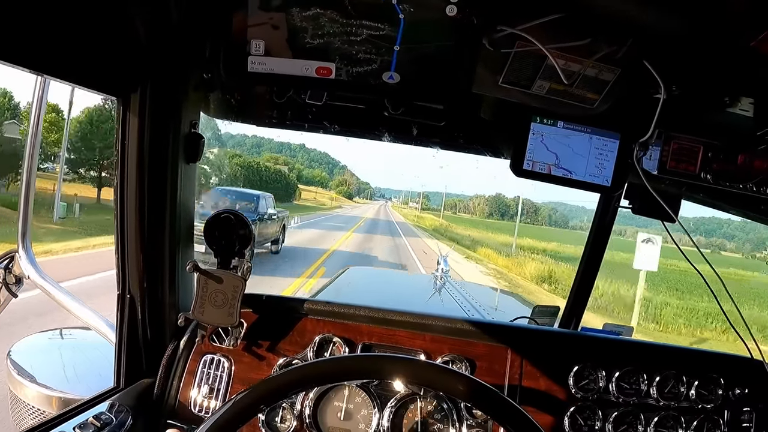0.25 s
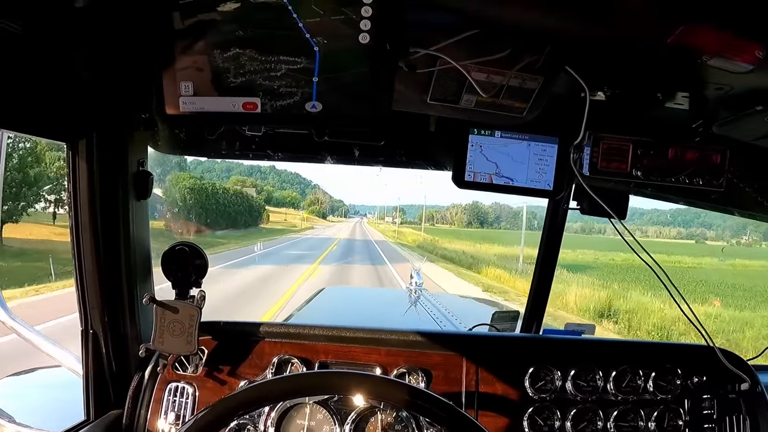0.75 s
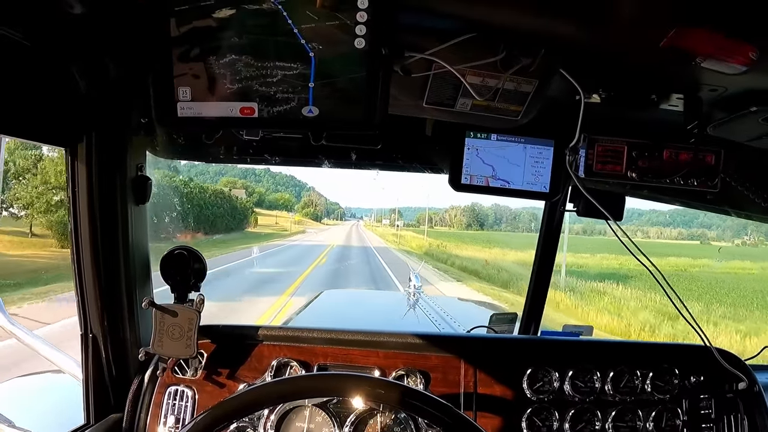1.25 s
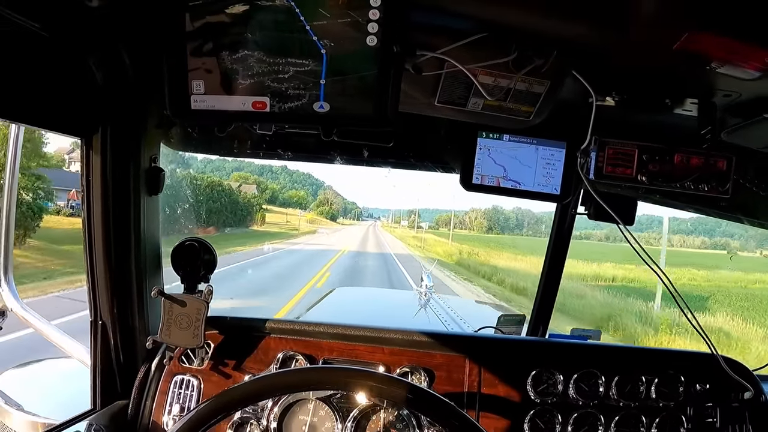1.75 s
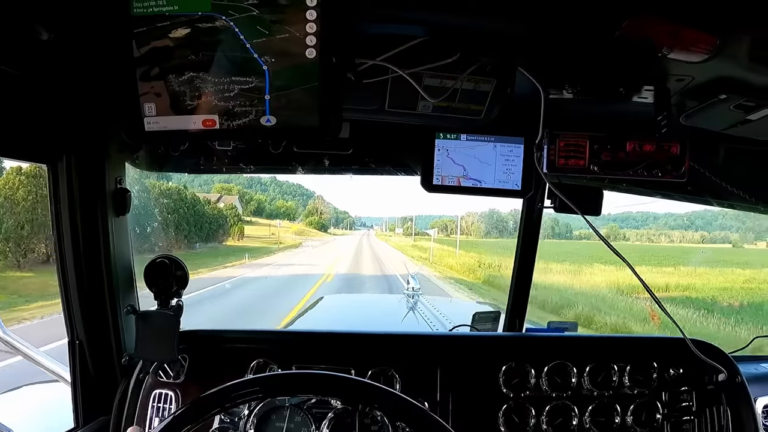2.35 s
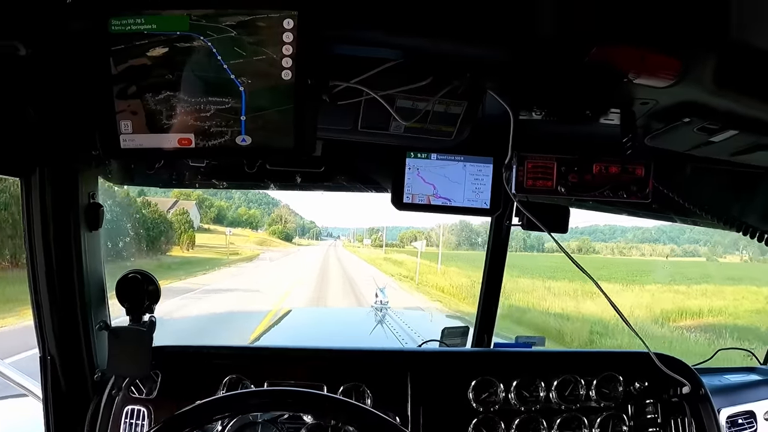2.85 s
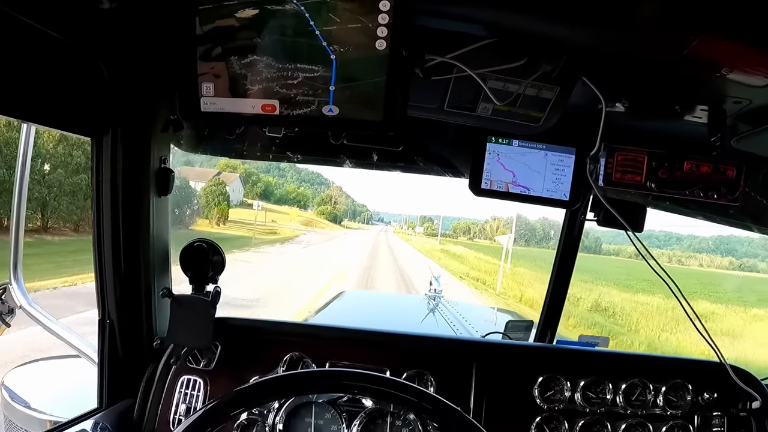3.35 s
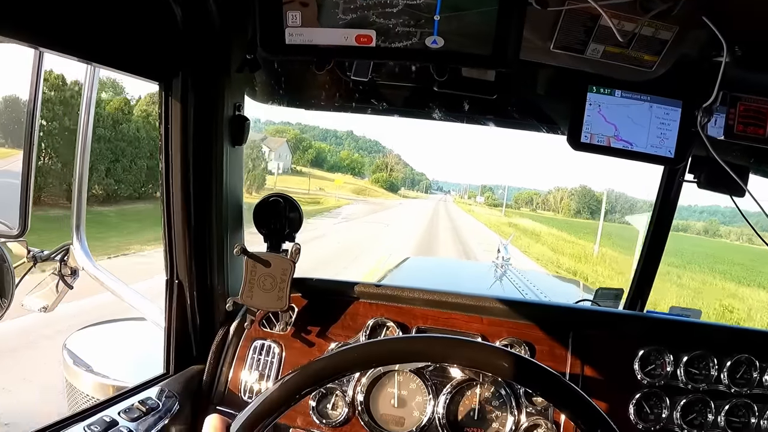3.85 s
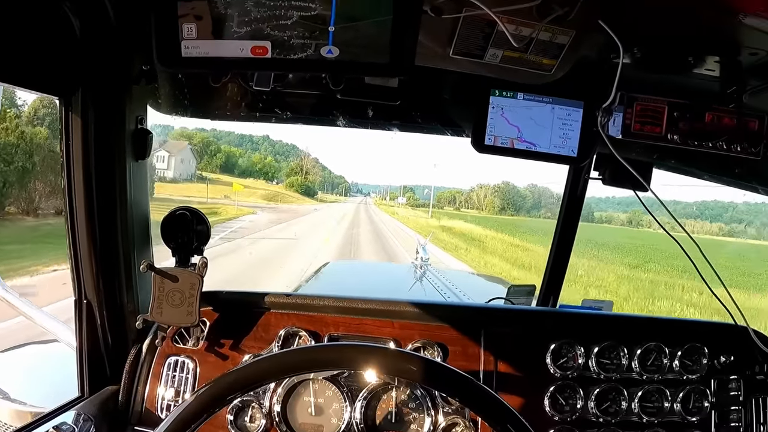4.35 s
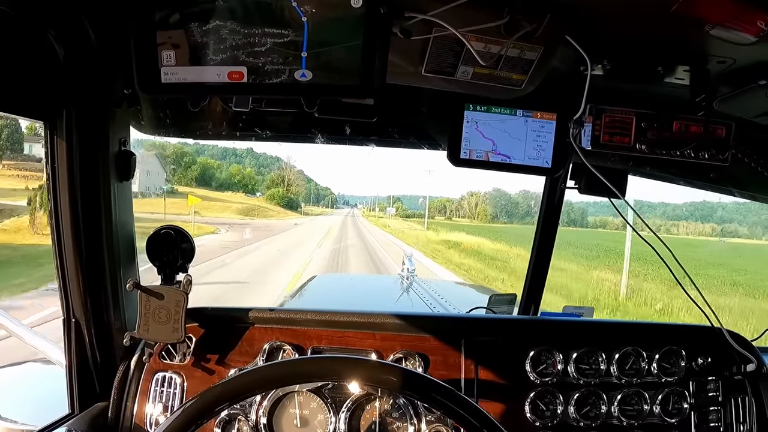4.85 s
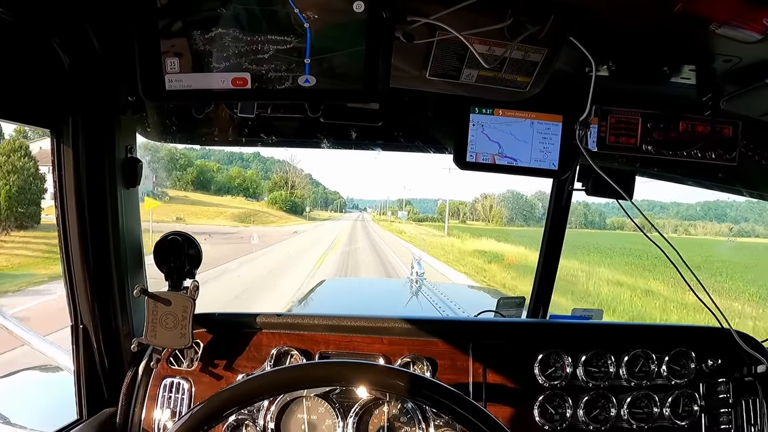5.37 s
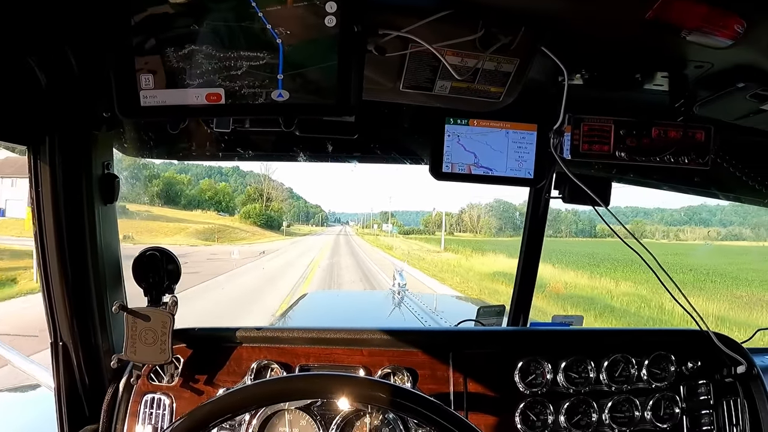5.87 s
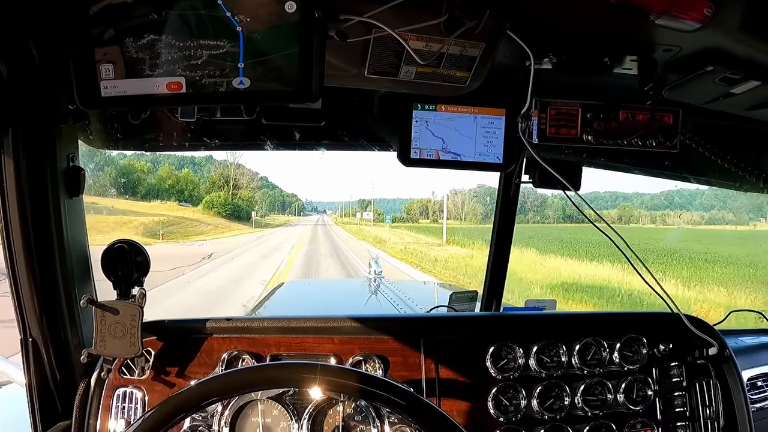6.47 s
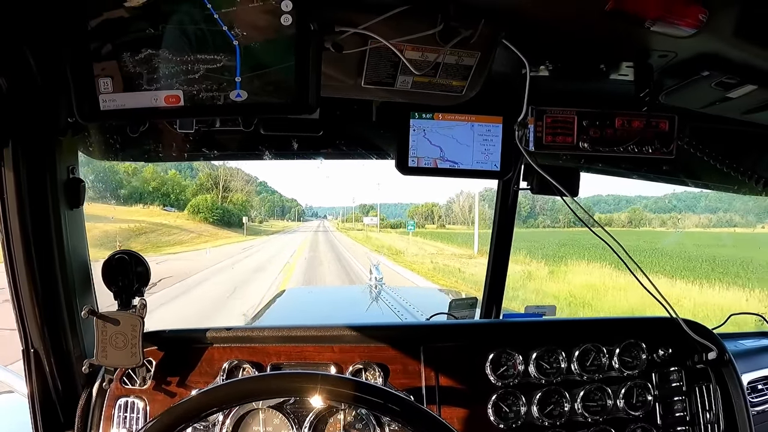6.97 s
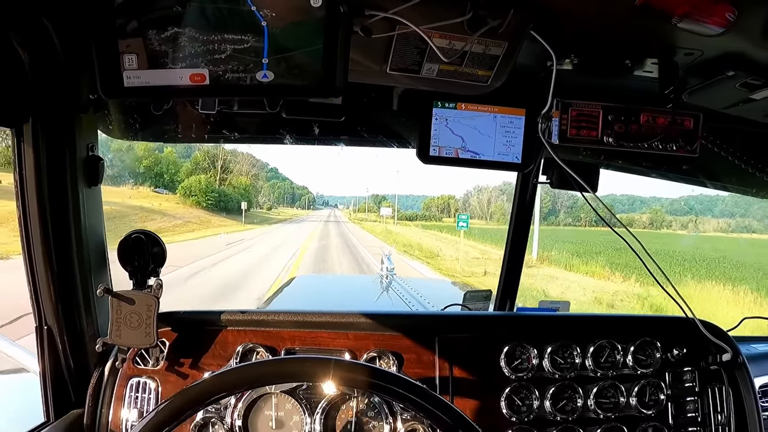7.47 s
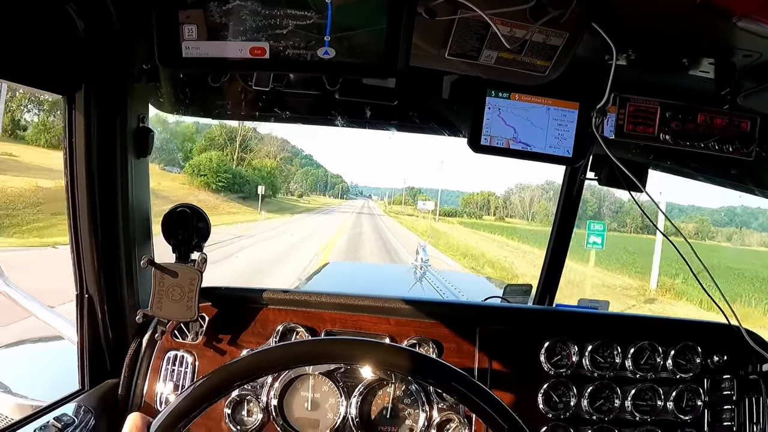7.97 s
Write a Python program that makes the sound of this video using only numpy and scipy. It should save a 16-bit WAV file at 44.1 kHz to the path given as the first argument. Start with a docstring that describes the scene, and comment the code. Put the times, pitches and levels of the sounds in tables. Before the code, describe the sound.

From inside a truck cab, a heavy diesel pulls hard with a rising turbo whistle, lifts off with a hiss, drops in pitch and pulls again.

```python
"""A six-cylinder diesel truck pulls hard on a country road, heard from the cab; it lifts off for a gear
change and pulls again. Clean firing tones make the drone; engine-cycle tones and pulsing noise make the growl.
A sine with a fuzzy skirt is the turbo whistle, gliding with the boost; shaped noise makes road, wind and hiss.
Soon draughts puff at single microphone ports (short dull noise) and a pickup sweeps past (a burst of hiss)."""
import sys
import numpy as np
from scipy import signal
from scipy.fft import rfft, irfft
from scipy.io import wavfile
from scipy.ndimage import uniform_filter1d

SR = 44100
rng = np.random.default_rng(int(sys.argv[2]) if len(sys.argv) > 2 else 0)


def materialize(psi):
    """Save the field psi as 16-bit PCM at rate SR to the path in sys.argv[1].

    A 1-D psi becomes a single channel; in a 2-D psi each row is a channel.
    """
    bounded = np.clip(np.atleast_2d(psi).T, -1, 1)
    quanta = np.round(bounded * 32767).astype(np.int16)
    wavfile.write(sys.argv[1], SR, quanta)


N = 362502  # samples


def gain_of(db):
    """Turn decibels into a plain multiplier."""
    return 10 ** (np.asarray(db) / 20)


def evened(x):
    """Scale a sound to an rms level of 1."""
    return x / np.sqrt(np.mean(x ** 2) + 1e-20)


def read(points, hz):
    """Read a spectrum at hz, with straight lines between points on a log axis."""
    f, value = np.transpose(points)
    return np.interp(np.log(hz + 1), np.log(f + 1), value)


def columns(rows, t):
    """Read every column of a time table at the times t."""
    times, *rest = np.transpose(rows)
    return [np.interp(t, times, column) for column in rest]


def wander(hz, count):
    """Make slow random curves of rms 1 that change about hz times a second."""
    knot_rate = 250  # random points per second
    knots = rng.standard_normal((count, 2200))
    b, a = signal.butter(2, np.clip(hz / (knot_rate / 2), .002, .9))
    smooth = signal.lfilter(b, a, knots)[:, 100:]  # drop the filter's start
    t = np.arange(N) / SR
    return [np.interp(t, np.arange(2100) / knot_rate, curve) for curve in evened(smooth[:, None])[:, 0]] \
        if count == 0 else [np.interp(t, np.arange(2100) / knot_rate, evened(curve)) for curve in smooth]


def resonate(x, hz, width):
    """Resonate at a moving pitch: shift the curve hz down to zero, smooth twice, shift back."""
    turn = np.exp(2j * np.pi * np.cumsum(hz) / SR)
    r = np.exp(-np.pi * width / SR)
    smooth = signal.lfilter([1], np.convolve([1, -r], [1, -r]), x / turn)
    return (turn * smooth).real


def rise_db(resonances, hz):
    """Add up the lift in dB that a list of resonances gives at hz."""
    return sum(db / (1 + (2 * (hz - f) / width) ** 2) for f, width, db in resonances)


# How much louder the left port is: (frequency [Hz], left minus right [dB])
LEFT_LOUDER = [(60, 0.9), (150, 0.2), (230, 3.5), (330, 2), (500, 3), (1170, 3.5), (3150, 2), (8470, 1),
               (13000, 1.5)]
# How far the left port is ahead: (frequency [Hz], phase lead [radians])
LEFT_AHEAD = [(0, 1), (520, -0.43), (950, -0.52), (1210, -0.91), (2670, -0.8), (4740, -0.24), (8610, -0.16)]


def port_gains(hz):
    """Share the level and phase difference equally between the left and right ports."""
    half = gain_of(read(LEFT_LOUDER, hz) / 2) * np.exp(.5j * read(LEFT_AHEAD, hz))
    return np.array([half, 1 / half])


def ports(x):
    """Hear a sound from one place at the two microphone ports."""
    return irfft(rfft(x) * port_gains(np.fft.rfftfreq(N, 1 / SR)), N)


# Engine speed and load: (time [s], firing rate [Hz], growl level before trims [dB]); load raises the growl
ENGINE = [(0, 75.7, -27), (.3, 76.8, -21), (1.0, 77.73, -20), (1.55, 78.93, -21), (2.0, 80.36, -28),
          (2.4, 79.26, -30), (2.9, 72.7, -30), (3.3, 67.14, -30), (4.1, 68.22, -29.5), (4.55, 68.34, -22.5),
          (5.04, 68.88, -18.5), (5.9, 70.7, -21.5), (6.35, 71.12, -27), (7.4, 72.18, -28),
          (7.75, 72.4, -24), (8.22, 73.47, -20.5)]


def engine(step):
    """Give firing rate, steadied by the flywheel, firings so far and growl level at every step-th sample."""
    t = np.arange(0, N + 40 * step, step) / SR
    firing_hz, growl_db = columns(ENGINE, t)
    firing_hz = uniform_filter1d(firing_hz, size=round(.45 * SR / step), mode="nearest")  # over 0.45 s
    return firing_hz, np.cumsum(firing_hz) * step / SR, growl_db


# Main drone tones: (time [s], level of firing tone [dB], of its 2nd multiple [dB], of its 3rd [dB])
DRONE = [(0, -13.5, -36, -35.5), (.5, -13, -26.5, -27.5), (.72, -18, -16.5, -31.5), (.9, -16, -19.5, -30.5),
         (1.26, -12.5, -35.5, -32), (1.65, -13, -30.5, -33.5), (1.9, -13.5, -28.5, -50),
         (2.2, -15.5, -37, -39), (2.5, -25, -33.5, -40), (2.7, -38, -27.5, -38.5), (3.06, -24, -29.5, -42),
         (3.24, -26.5, -25.5, -33.5), (3.78, -17, -22.5, -35), (4.14, -15, -22, -43),
         (4.32, -17, -15.5, -36), (4.68, -26, -12, -56), (4.86, -20.5, -19, -33), (5.2, -22, -15, -20.5),
         (5.7, -20.5, -15.5, -29.5), (5.94, -34.5, -12, -28.5), (6.66, -28, -11.3, -36),
         (6.9, -24, -15, -35.5), (7.38, -19.5, -17, -32), (7.74, -20.5, -16.5, -35.5),
         (8.22, -19, -14.5, -51.5)]
# Pitch of the five tones: (multiple of the firing rate)
DRONE_MULTIPLES = 1, 2, 3, 3 / 2, 7 / 3
# Unsteadiness of the five tones, the lesser ones lumpier: (level sway [dB rms])
DRONE_SWAY_DB = .53, .53, 1.5, 4, 4
# Crank orders 4.5 and 7, the last two tones: (base level [dB])
ODD_ORDER_DB = [-50.5, -46.5]
# Their lift while the engine slows: (lift [dB per Hz/s of falling firing rate])
ODD_ORDER_PER_SLOWING = [0.89, 0.58]
# Cab resonances that lift those two orders: (frequency [Hz], width [Hz], lift [dB])
CAB = [(113.6, 20, 17), (170.1, 5, 8.5), (186.3, 6.6, 14)]


def drone():
    """The low engine orders stand in the cab as near-clean tones."""
    firing_hz, firings, _ = engine(step=1)
    firing_hz, firings = firing_hz[:N], firings[:N]
    t = np.arange(N) / SR
    slowing = np.maximum(-np.gradient(firing_hz, t), 0)  # Hz/s
    levels_db = columns(DRONE, t)
    for k, db, per in zip(DRONE_MULTIPLES[3:], ODD_ORDER_DB, ODD_ORDER_PER_SLOWING):
        levels_db.append(db + rise_db(CAB, k * firing_hz) + per * slowing)
    sway = wander(hz=7.0, count=5)
    out = 0
    for i, k in enumerate(DRONE_MULTIPLES):
        level = np.sqrt(2) * gain_of(levels_db[i] + DRONE_SWAY_DB[i] * sway[i])
        # the exhaust pipe smears the pulse: delay grows with the square of the tone's number, from 0
        lag = np.pi / 2 * i ** 2
        out = out + level * np.cos(2 * np.pi * k * firings + 0.047 * sway[i - 1] - lag)
    return out


# Lesser tones of the uneven cylinders: (multiple of the engine cycle)
CYCLE_LINES = np.array([2, 3, 4, 5, 7, 8, 10, 11, 13, 16, 17, 20, 21, 24, 26, 27, 28, 29, 30, 32, 33, 34, 35, 36, 38, 40, 41, 42, 44, 48])
# Strength of each of those tones: (relative level [dB])
CYCLE_DB = [-8, -6, 0, -10, -11, -4, -1, -6, -10, -16, -14, -9, -15, -1, -10, -14, -8, -9, -1, -3, -11, -9,
            -8, -5, -2, -8, -8, -8, -4, -7]
# Combustion noise heard through the firewall: (frequency [Hz], relative level [dB])
FIREWALL = [(30, -22), (120, -8), (230, -3.5), (330, -6), (388, 1), (440, -3.5), (560, 2), (700, -21.5),
            (900, -30.5)]
# Panels rung by the combustion knock: (frequency [Hz], width [Hz], relative level [dB])
PANELS = [(895, 55, 0), (1140, 35, -4), (1420, 60, -12), (1680, 40, -9), (1840, 60, -9), (2005, 50, -10),
          (2570, 120, -13)]


def growl():
    """Tones of the engine cycle, noise that swells at every firing, and the panels that it rings."""
    step = 8  # work at an eighth of the sample rate
    rate = SR / step
    firing_hz, firings, growl_db = engine(step)
    count = len(firing_hz)
    sway = np.array(wander(hz=2.5, count=12))[:, ::step]
    sway = np.pad(sway, ((0, 0), (0, count - sway.shape[1])), "edge")
    start = rng.random(len(CYCLE_LINES))
    lines = 0
    for i, k in enumerate(CYCLE_LINES):
        floor_db = 5 / (1 + ((k * firing_hz / 6 - 388) / 14) ** 2)  # the cab floor resonates at 388 Hz
        line_db = CYCLE_DB[i] + floor_db + 1.8 * sway[i % 12]
        lag = start[i] * (.3 if k % 6 == 0 else 1)  # firing multiples nearly add up to one pulse
        phase = 2 * np.pi * (k / 6 * firings - lag) + .3 * sway[(i + 5) % 12]
        lines = lines + gain_of(line_db) * np.cos(phase)
    puffs = np.exp(.5 * np.cos(2 * np.pi * firings)) * rng.standard_normal(count)
    firewall = gain_of(read(FIREWALL, np.fft.rfftfreq(count, 1 / rate)))
    thud = irfft(rfft(puffs) * firewall, count)
    ring = 0
    for f, width, db in PANELS:
        b, a = signal.iirpeak(f, f / width, rate)
        ring = ring + gain_of(db) * evened(signal.lfilter(b, a, puffs))
    firm = np.clip((growl_db + 36) / 9, .3, 1)  # the tones fade off the throttle
    body = gain_of(growl_db - 2.5) * (firm * evened(lines) + .36 * evened(thud))
    # the knock follows the load less than the exhaust does
    clatter = gain_of(0.81 * growl_db - 17.5) * evened(ring)
    return signal.resample_poly(body + clatter, step, 1)[:N]


# Levels before trims: (time [s], road rumble [dB], wind and tyre roar [dB], intake hiss [dB], fine hiss [dB])
AIR = [(0, -36, -32.5, -42.5, -57), (.5, -30.5, -32, -42.5, -48.5), (.9, -25.5, -32, -39, -52),
       (1.3, -27.5, -31.5, -39.5, -63), (1.7, -34, -33, -42, -54), (2.16, -19.5, -32.5, -42.5, -63),
       (2.4, -20, -33, -44.5, -49), (3.1, -18, -34.5, -43.5, -54), (3.6, -19.5, -31, -41.5, -56.5),
       (4.1, -22, -30.7, -45.5, -60), (4.6, -30, -31, -41, -47.5), (5.5, -23.5, -30, -37, -49.5),
       (5.8, -26.5, -29.5, -38, -50), (6.0, -21, -33, -40.5, -55), (6.3, -36, -34.5, -43.5, -60),
       (6.95, -27.5, -36.5, -44.5, -71), (7.2, -25, -33.5, -43.5, -58), (7.8, -25.5, -30, -41, -56),
       (8.22, -37, -31, -39, -53)]
# Colour of the road rumble: (frequency [Hz], relative level [dB per Hz])
RUMBLE = [(15, -4), (30, 0), (45, -1.5), (60, -6.5), (110, -2.5), (200, -11.5), (300, -38)]


def rumble():
    """The road shakes the cab, which booms unsteadily at its lowest air mode."""
    hz = np.fft.rfftfreq(N, 1 / SR)
    colour = gain_of(read(RUMBLE, hz) - 60 * (hz > 300))
    shake = irfft(rfft(rng.standard_normal(N)) * colour, N)
    swell, drift = wander(hz=4.8, count=2)
    boom = gain_of(2.5 * swell) * np.cos(2 * np.pi * np.cumsum(45.2 + 1.2 * drift) / SR)
    rumble_db = columns(AIR, np.arange(N) / SR)[0]
    return gain_of(rumble_db) * (.75 * evened(shake) + .7 * evened(boom))


# Resonances of the intake duct: (frequency [Hz], width [Hz], lift [dB])
DUCT = [(3050, 120, 3), (4250, 260, 6), (4800, 160, 6), (5500, 150, 2), (6150, 150, 3), (6750, 120, 4)]


def duct_gain(hz):
    """The intake duct lifts sounds near its resonances."""
    return gain_of(rise_db(DUCT, hz))


# Turbo whistle: (time [s], blade tone [Hz], level before trims [dB])
TURBO = [(0, 6000, -64), (.36, 6560, -46), (.54, 7170, -49), (.72, 7497, -46), (1.08, 8280, -43),
         (1.3, 8320, -50), (1.55, 8617, -53), (1.95, 8700, -55), (2.16, 8420, -44), (2.34, 7730, -46.5),
         (2.55, 6840, -43.5), (2.85, 5700, -51), (3.25, 4834, -43.5), (3.45, 4350, -56),
         (3.68, 4065, -47.5), (3.95, 3930, -57), (4.25, 4142, -58), (4.55, 4710, -52), (4.75, 5284, -60),
         (5.04, 6304, -50), (5.4, 7250, -47), (5.76, 7793, -41), (6.2, 7816, -54), (6.66, 7804, -49.5),
         (6.9, 7603, -50.5), (7.2, 7230, -49.5), (7.4, 7170, -50), (7.85, 6960, -43.5), (8.22, 7290, -47.5)]


def turbo():
    """A flickering blade tone with a fuzzy skirt enters by the left window and reaches that port first."""
    blade_hz, tone_db = columns(TURBO, np.arange(N) / SR)
    blade_hz = uniform_filter1d(blade_hz, size=5000, mode="nearest")  # the rotor's inertia rounds every turn
    flicker, drift = wander(hz=25.1, count=2)
    phase = 2 * np.pi * np.cumsum(blade_hz + 15 * drift) / SR
    tone = np.sqrt(2) * gain_of(3.2 * flicker) * np.cos(phase)
    skirt = evened(resonate(rng.standard_normal(N), blade_hz * .99, width=350))
    glide = np.gradient(uniform_filter1d(blade_hz, size=4000)) * SR  # Hz/s
    steady = 1 / (1 + (glide / 3500) ** 2)  # fast glides turn breathy
    whistle = gain_of(tone_db + 0.5) * duct_gain(blade_hz) * (steady * tone + 0.85 * skirt)
    return gain_of([[2.5], [-2.5]]) * np.array([whistle, np.roll(whistle, shift=1)])


def shape(points, hz):
    """Turn a noise colour into a spectrum of unit total power."""
    gain = gain_of(read(points, hz))
    return gain / np.linalg.norm(gain)


# Colour of the intake hiss: (frequency [Hz], relative level [dB per Hz])
INTAKE = [(1800, -3), (2800, 1), (3500, 0.5), (4250, -2.5), (5200, -3), (6500, -3), (9000, -12.5),
          (12000, -20)]


def intake_hiss(hz, place, intake_db):
    """Intake hiss is cut above the blade tone, so it brightens with turbo speed."""
    under_blades = 1 / np.sqrt(1 + (place / 1.58) ** 12)
    return duct_gain(hz) * shape(INTAKE, hz) * under_blades * gain_of(intake_db + 6.0)


# Colour of the wind and tyre roar: (frequency [Hz], relative level [dB per Hz])
ROAR = [(120, -19.5), (200, -4.5), (257, -17), (290, -5.5), (386, -15), (430, -14), (528, -11.5),
        (553, -12.5), (872, -17), (1030, -10.5), (1390, -18.5), (1730, -18.5), (3500, -34), (4550, -51),
        (7700, -120)]
# Colour of the fine hiss: (frequency [Hz], relative level [dB per Hz])
FINE = [(4000, -3), (7000, 5), (9000, -4), (10500, -10), (12000, -13.5), (12800, -15), (14000, -32),
        (15000, -55)]
# How alike the noise is at the two ports: (frequency [Hz], likeness [1 = the same])
SAME = [(60, 0.99), (160, 1), (430, 0.82), (1170, 0.81), (3150, 0.62), (8470, 0.67)]


def air():
    """All the airy noise: random short-time spectra with drifting patches, partly alike at the ports."""
    frames = N // 256 + 5
    t = np.arange(frames) * 256 / SR
    hz = np.fft.rfftfreq(1024, 1 / SR)[:, None]  # frequency runs down, time runs across
    a, b, c, d, patches = rng.standard_normal((frames, 513, 5)).T
    patches = uniform_filter1d(patches, size=12, axis=0)
    patches = evened(uniform_filter1d(patches, size=14, axis=1))
    _, roar_db, intake_db, fine_db = columns(AIR, t)
    place = hz / columns(TURBO, t)[0]  # frequency as a multiple of the blade tone
    layers = (shape(ROAR, hz) * gain_of(roar_db + 6.0),
              intake_hiss(hz, place, intake_db),
              shape(FINE, hz) * gain_of(fine_db + 11.0),
              gusts(hz, t), upper_whistle(hz, place, t), boost_rush(hz, place, t))
    level = np.sqrt(sum(layer ** 2 for layer in layers)) * gain_of(1.08 * patches)
    same = np.clip(read(SAME, hz), -1, 1)
    left = a + 1j * b
    right = same * left + np.sqrt(1 - same ** 2) * (c + 1j * d)
    spectra = np.array([left, right]) * level * port_gains(hz)
    return signal.istft(spectra, nperseg=1024, noverlap=768)[1][:, :N] * 0.73


# Draughts: (time [s], level [dB], length [s], port [0 left, 1 right])
PUFFS = [(0.322, -24, 0.017, 0), (0.432, -24, 0.026, 1), (1.721, -18, 0.027, 0), (1.785, -16.5, 0.064, 1),
         (2.395, -31, 0.037, 0), (3.658, -19.5, 0.035, 1), (4.224, -22, 0.047, 0), (4.802, -19, 0.032, 0),
         (5.369, -29, 0.039, 0), (8.018, -20, 0.083, 1)]


def draughts():
    """Short dull puffs of air, each at one port only."""
    out, t = np.zeros((2, N)), np.arange(N) / SR
    low_pass = signal.butter(4, 900, fs=SR, output="sos")
    dull = signal.sosfilt(low_pass, rng.standard_normal(N))
    noise = evened(signal.lfilter([1], [1, -.985], dull))
    for s, db, length, port in PUFFS:
        out[round(np.clip(port, 0, 1))] += gain_of(db) * np.exp(-(2 * (t - s) / length) ** 2) * noise
    return out


# The passing pickup, then a spit of air: (time [s], relative level [dB], half width [s], tilt [dB per octave])
GUSTS = [(.75, -25.5, 0.11, -1), (1.15, -34, 0.013, 6.5)]
# Colour of both bursts before the tilt: (frequency [Hz], relative level [dB per Hz])
GUST = [(300, -11), (1400, 5.5), (3000, -6), (4500, -5), (8000, -22), (13000, -29), (15000, -61)]


def gusts(hz, t):
    """Bursts of wide hiss swell and fade: the passing pickup and then a short spit of air."""
    bursts = 0
    for s, db, width, tilt in GUSTS:
        tilted = gain_of(db + tilt * np.log2(hz / 1500 + .1))
        bursts = bursts + tilted * np.exp(-((t - s) / width) ** 2)
    return shape(GUST, hz) * bursts


def upper_whistle(hz, place, t):
    """A breathy second whistle comes out around the gear change, lost in the cab lining above 11 kHz."""
    start_s, rise_s, end_s, fall_s = 2.0, 0.79, 5.03, .6
    quiet_db, full_db = -78, -52.5  # before trims
    out = np.clip(np.minimum((t - start_s) / rise_s, 1 - (t - end_s) / fall_s), 0, 1)
    upper_db = quiet_db + (full_db - quiet_db) * out
    band = np.exp(-((place - 1.45) / 0.053) ** 2) / (1 + (hz / 11500) ** 14)
    return band * gain_of(upper_db - 0.5)


# Spare boost let out as the throttle shuts, then spooling in again: (time [s], level before trims [dB])
RUSH = [(0, -60), (2.2, -67), (2.5, -46), (2.8, -42.5), (3.15, -38), (3.45, -40.5), (3.8, -61), (4.4, -57),
        (4.9, -63), (5.5, -55), (6, -54), (6.4, -76), (8.22, -60)]


def boost_rush(hz, place, t):
    """Spare boost rushes out as a band of noise just below the blade tone, lifted by the duct."""
    band = np.exp(-((place - .87) / 0.18) ** 2)
    return duct_gain(hz) * 0.22 * band * gain_of(columns(RUSH, t)[0])


def scene():
    """Everything at the two ports."""
    return ports(drone() + growl() + rumble()) + turbo() + air() + draughts()


def record(dry):
    """Limit the band: a low-pass filter takes away the sound above 15 kHz."""
    low_pass = signal.firwin(511, 15000, window=("kaiser", 9), fs=SR)
    return signal.oaconvolve(dry, low_pass[None], "same")


dry = scene()
out = record(dry)
materialize(out)
```